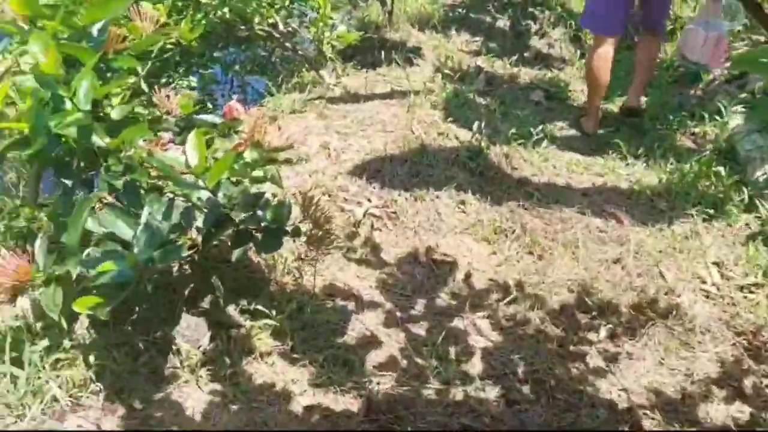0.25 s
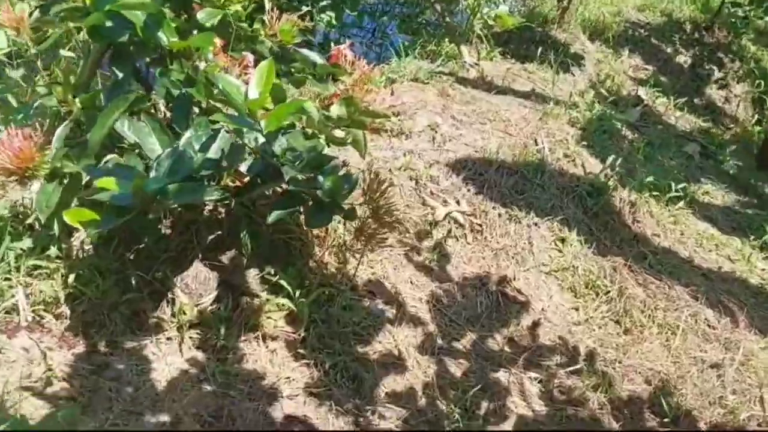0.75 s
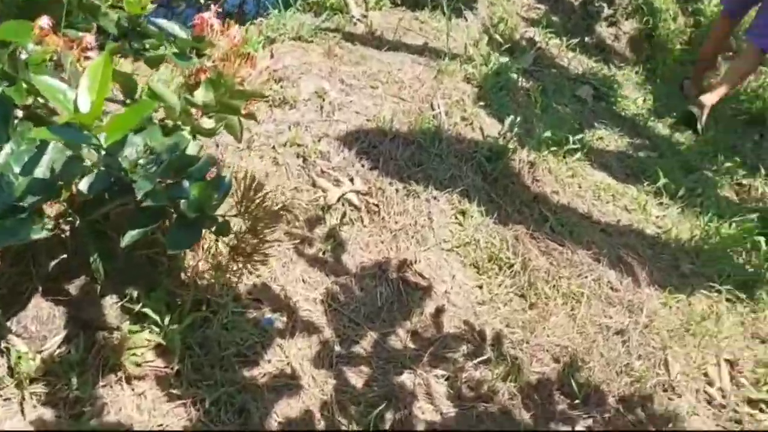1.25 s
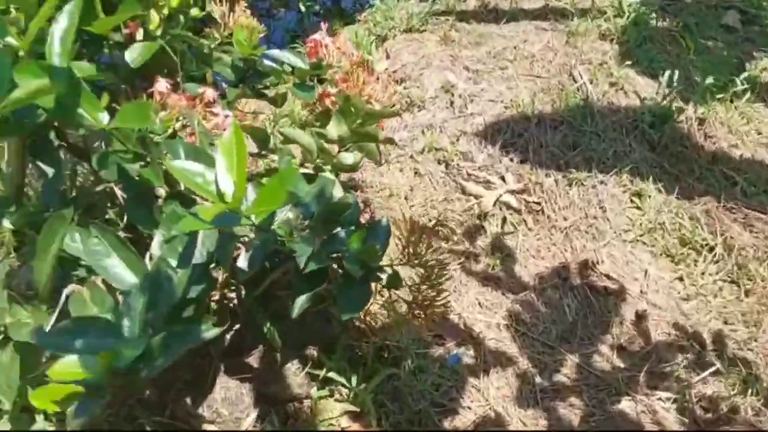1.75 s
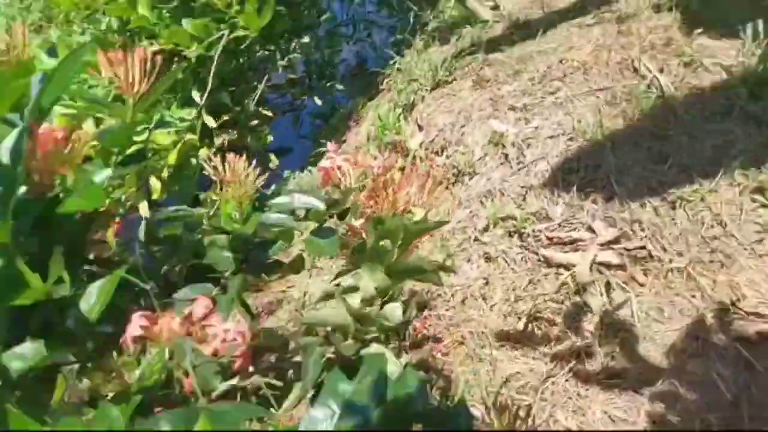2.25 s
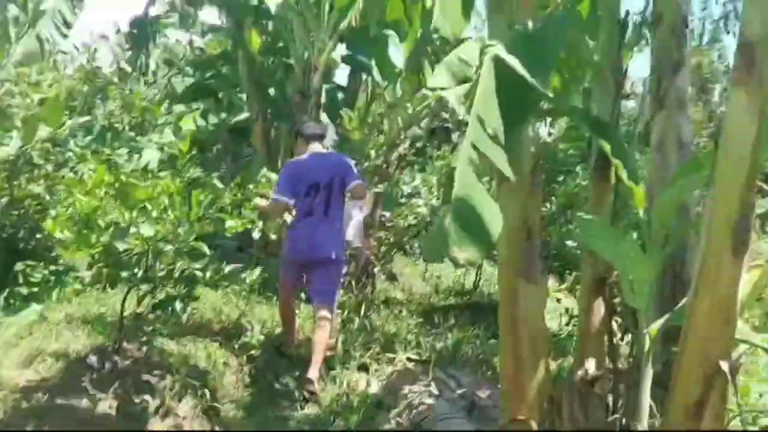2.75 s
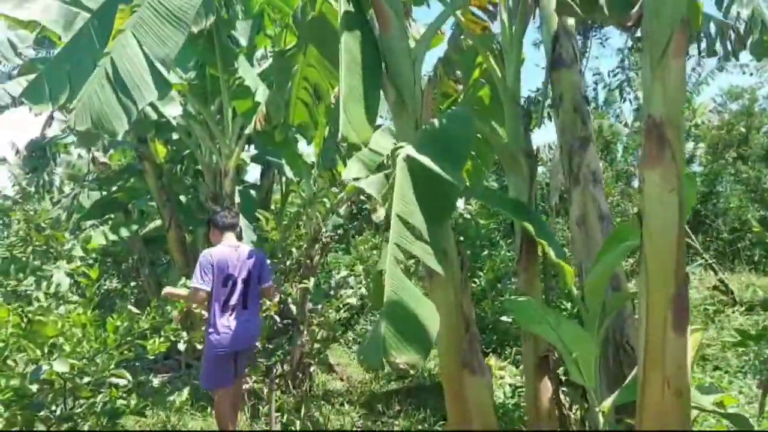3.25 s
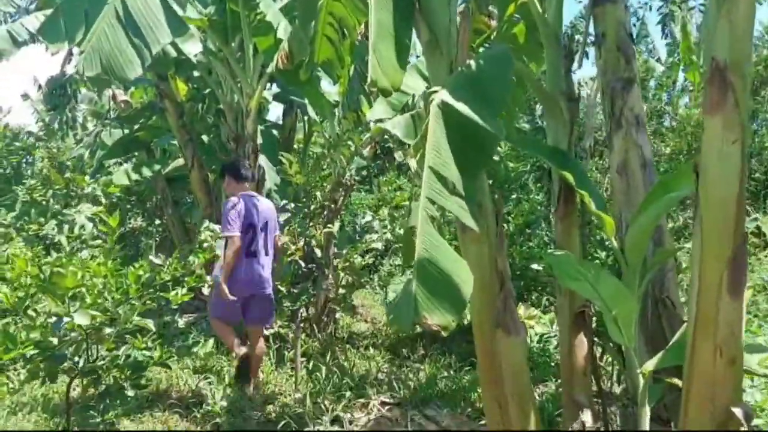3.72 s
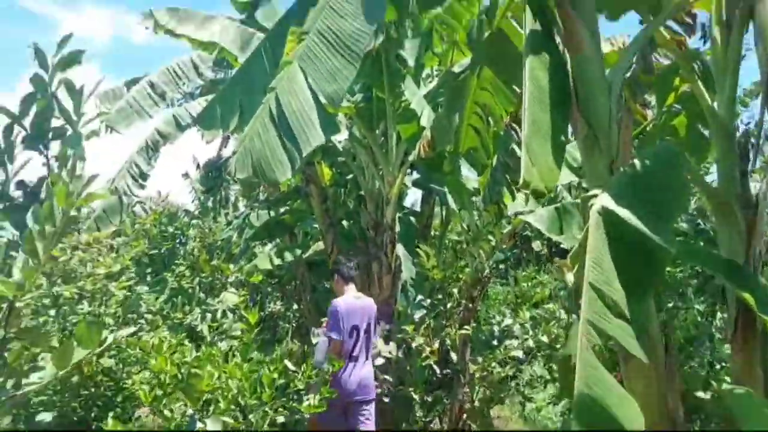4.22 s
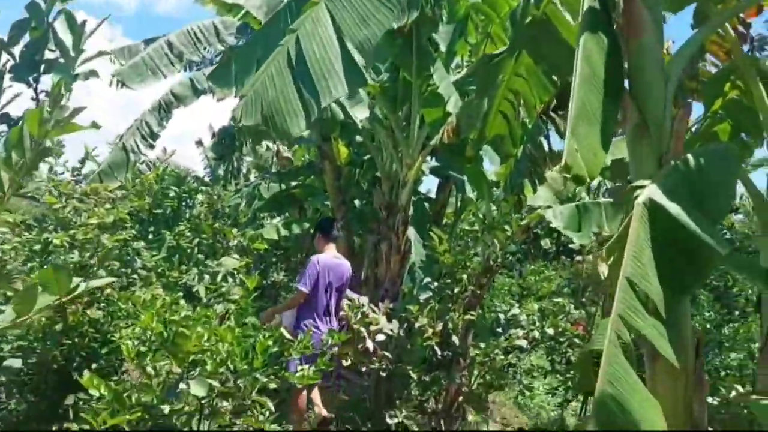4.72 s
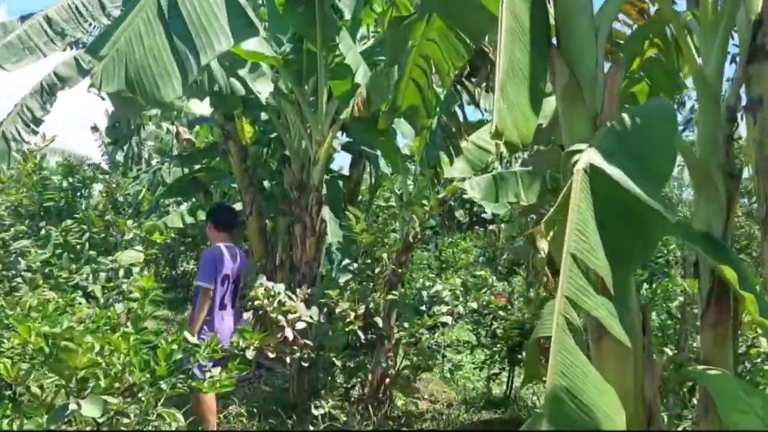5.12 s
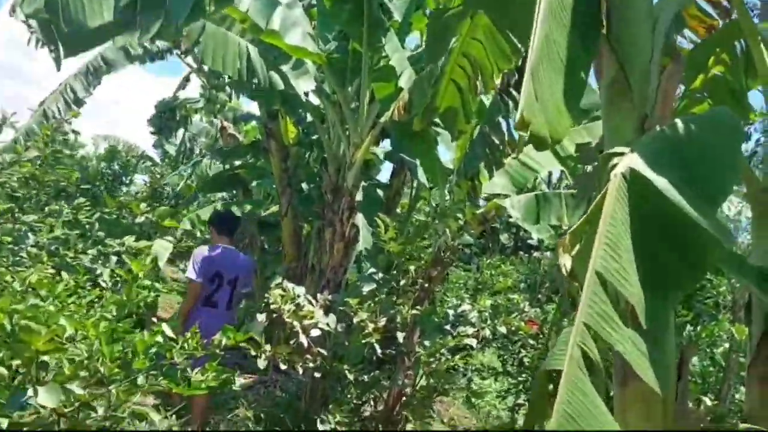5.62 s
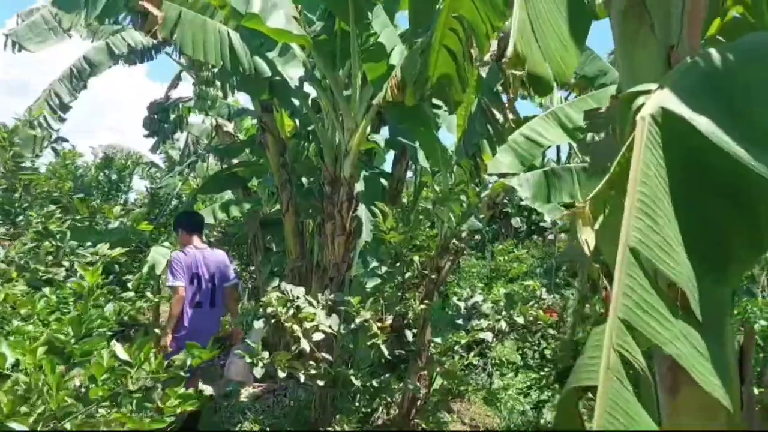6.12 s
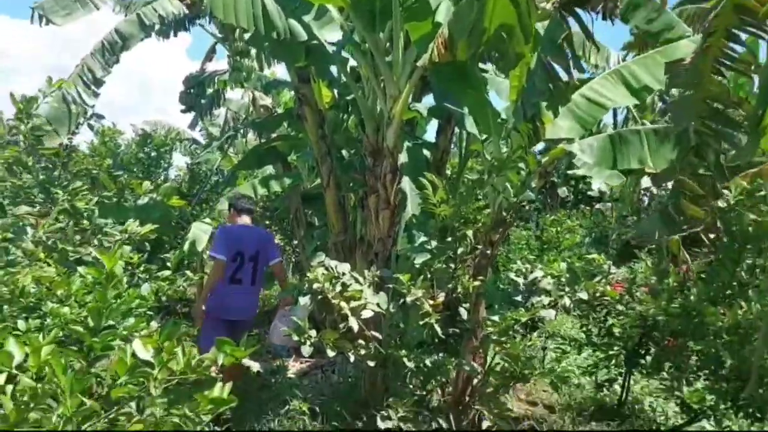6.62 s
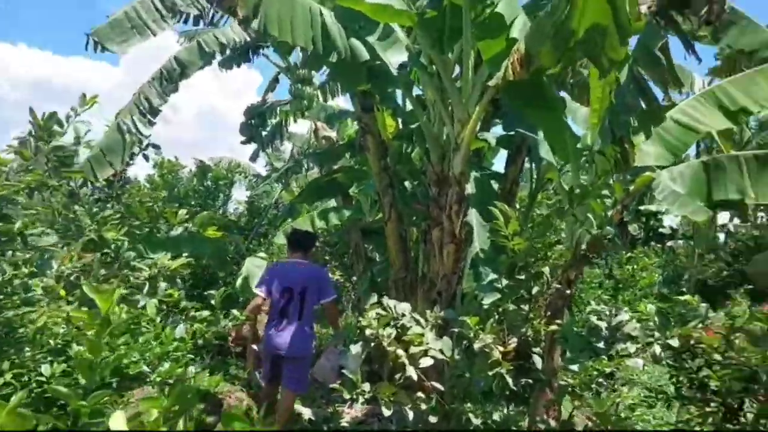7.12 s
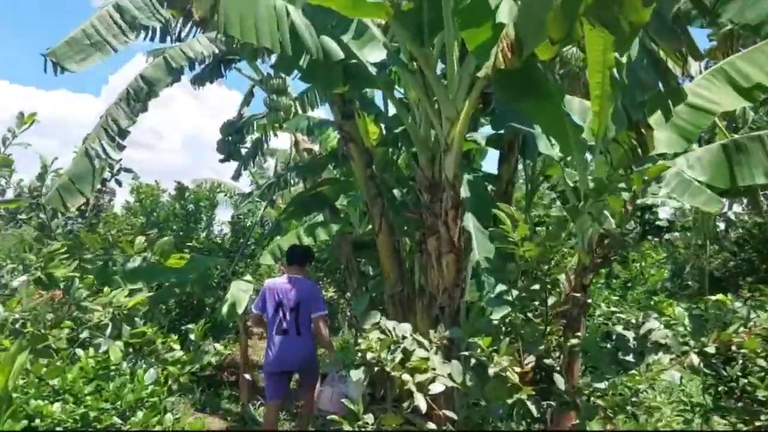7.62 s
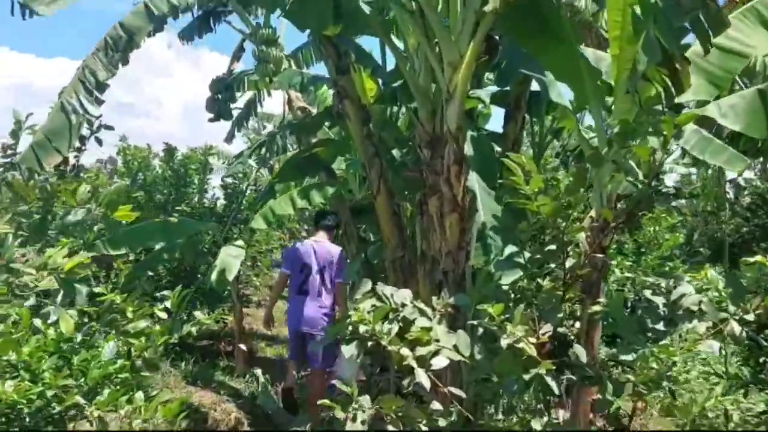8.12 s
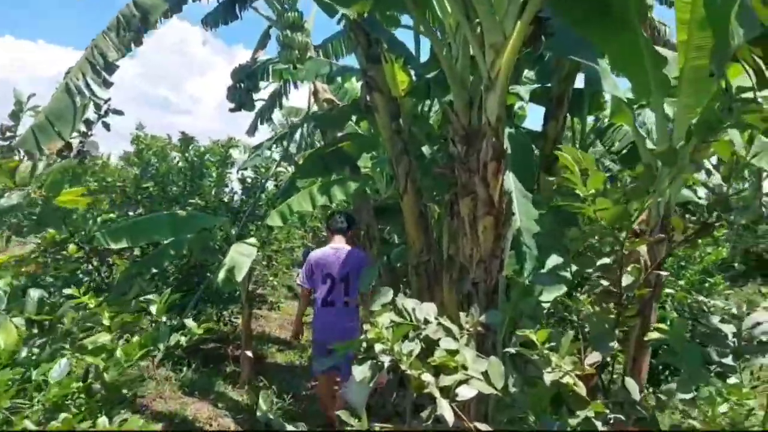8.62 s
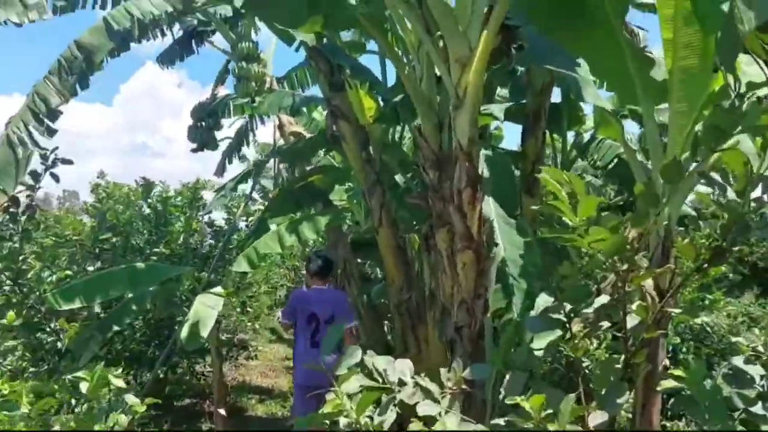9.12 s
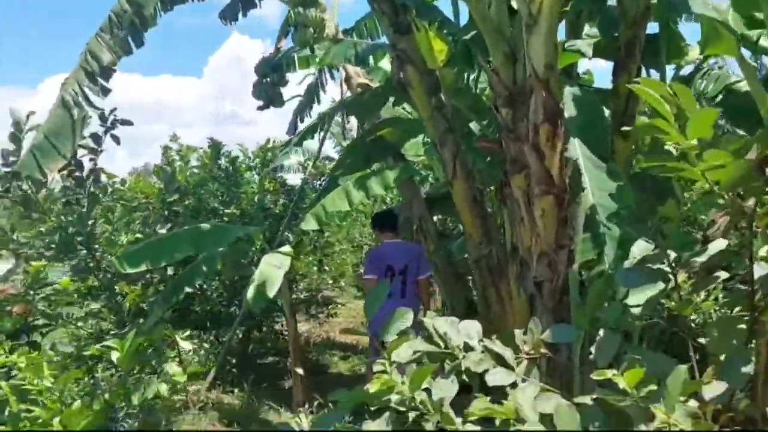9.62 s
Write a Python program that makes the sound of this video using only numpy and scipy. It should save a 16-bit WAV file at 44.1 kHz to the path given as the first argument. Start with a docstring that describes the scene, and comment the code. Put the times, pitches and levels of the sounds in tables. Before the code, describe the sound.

Outdoors among trees, someone walks unevenly over dry leaves and grass, crunching and breaking twigs near the microphone. Twice in the first half a bag crinkles with a hollow sound, the second time louder. The walking goes quiet for a moment, then resumes as a gust bumps the microphone. A very faint hoot passes far away, and soft wind rumble and distant rustling leaves lie underneath.

```python
"""Feet sweep through dry grass and leaf litter on an orchard path, over faint far foliage and low wind.
From the first steps stalks hiss, leaves crunch and twigs snap, loudest just before 1 s. Around 2 s and
again from 3.5 to 5 s a carried bag crumples, its creases ringing hollow air pockets; a flurry of snaps
tops the second bout. After a lull the steps pick up at 6 s and wind thumps the microphone ports.
A faint far hoot passes near 7.7 s, and the feet rustle on to the end."""
import sys
import numpy as np
from scipy import signal
from scipy.io import wavfile
from scipy.ndimage import uniform_filter1d

SR = 44100
rng = np.random.default_rng(int(sys.argv[2]) if len(sys.argv) > 2 else 0)


def int16_out(signal):
    """Quantize to a 16-bit WAV file."""
    q = np.round(np.clip(np.atleast_2d(signal).T, -1, 1) * 32767)
    wavfile.write(sys.argv[1], SR, q.astype(np.int16))


N = 434778


def gain_of(db):
    """Decibels to an amplitude factor."""
    return 10 ** (np.asarray(db) / 20)


def unit_rms(x):
    """Scales a signal to rms 1."""
    return x / np.sqrt(np.mean(x ** 2) + 1e-20)


def spectrum_at(points, hz):
    """Reads a spectrum table on a log frequency axis."""
    f, value = np.transpose(points)
    return np.interp(np.log(hz + 1), np.log(f + 1), value)


def automation(rows):
    """One curve per column after the time, one value a sample."""
    seconds, *columns = np.transpose(rows)
    return [np.interp(np.arange(N) / SR, seconds, column) for column in columns]


def wander(seconds):
    """Smooth random drift of rms 1 on the given time scale."""
    size = max(round(seconds * SR), 1)
    return unit_rms(uniform_filter1d(uniform_filter1d(rng.standard_normal(N), size), size))


def colour(x, points):
    """Minimum-phase EQ, so that clicks keep a sharp front."""
    db = np.maximum(spectrum_at(points, abs(np.fft.fftfreq(4096, 1 / SR))), -60)
    response = np.exp(np.conj(signal.hilbert(np.log(gain_of(db)))))
    taps = np.fft.ifft(response).real[:2048]
    return signal.oaconvolve(x, taps[None], axes=1)[:, :N]


def ring(x, hz, width_hz):
    """A two-pole resonance."""
    r = np.exp(-np.pi * width_hz / SR)
    return signal.lfilter([1 - r, 0, r - 1], [1, -2 * r * np.cos(2 * np.pi * hz / SR), r * r], x)


def drifting_ring(x, hz, width_hz):
    """A resonance whose pitch drifts by 3.5 %: shift down to zero, smooth twice, shift back."""
    pitch = hz * (1 + 0.035 * wander(0.06))
    carrier = np.exp(2j * np.pi * np.cumsum(pitch) / SR)
    x = x / carrier
    for width in (width_hz, 2 * width_hz):
        x = signal.lfilter([1], [1, -np.exp(-np.pi * width / SR)], x)
    return unit_rms((carrier * x).real)


def envelopes(rows):
    """Power of each event in 1 ms frames: ramps in dB around a hold, steeper past a knee."""
    ramp_db, knee, steepening = 20, 0.6, 0.72
    full_at, rise, hold, fall, db = np.abs(np.transpose(rows)[:5, :, None])
    t = np.arange(0, N / SR + 0.002, 0.001)
    away = np.maximum(full_at - t, 0) / (rise + 1e-4) + np.maximum(t - full_at - hold, 0) / (fall + 1e-4)
    return gain_of(-db - ramp_db * (away + steepening * np.maximum(away - knee, 0))) ** 2


def per_sample(frames):
    """Stretches 1 ms frames to one value a sample."""
    return np.interp(np.arange(N) / SR, np.arange(len(frames)) * 0.001, frames)


def total_gain(power):
    """Adds the powers of events into one gain curve."""
    return per_sample(np.sqrt(power.sum(0)))


def follow_loudest(power, values):
    """Power-weighted mean of one value per event."""
    return per_sample((power * values).sum(0) / (power.sum(0) + 1e-30))


def crackle(lag_ms, per_s, spread_db, clump_db, clump_s, scatter_ms, wet_db, t60, likeness,
            patches=3, pitched=False):
    """Clumped clicks; each reaches the ports with its own lag, then scatters off a patch of undergrowth."""
    chance, size = rng.random(N), np.minimum(rng.exponential(1, N), 5)
    side, sign = rng.standard_normal(N), rng.choice([-1, 1], N)
    clicks = sign * gain_of(spread_db * size + clump_db * wander(clump_s)) * (chance < per_s / SR)
    lag = (lag_ms + scatter_ms * side) * SR / 1000
    arrival = np.clip(np.arange(N) + 40 + lag, 0, N + 80)  # 40 samples of room for early clicks
    whole, part = arrival.astype(int), arrival % 1
    patch = rng.integers(0, patches, N)
    t, out = np.arange(3000) / SR, np.zeros((2, N))
    for k, hz in enumerate(np.geomspace(1800, 11900, patches)):
        right = clicks * (patch == k)
        if pitched:  # each tuft stirs on its own
            right = right * gain_of(2.5 * wander(0.013))
        left = np.bincount(whole, right * (1 - part), N + 90)
        left += np.bincount(whole + 1, right * part, N + 90)
        direct = np.array([left[40:N + 40], right])
        if pitched:  # and rings at its own pitch
            direct = direct + gain_of(9) * ring(direct, hz, 0.31 * hz)
        shared, apart = rng.standard_normal((2, len(t))) * gain_of(-60 * t / t60)
        tail = np.array([shared, likeness * shared + np.sqrt(1 - likeness ** 2) * apart])
        tail /= np.linalg.norm(shared)
        out += direct + gain_of(wet_db) * signal.oaconvolve(direct, tail, axes=1)[:, :N]
    return out


# Stereo image of the noise beds. Each row: frequency in Hz, left-right correlation.
BED_LIKENESS = [(60, 0.049), (300, 0.44), (800, 0.11), (2000, 0.17), (4000, 0.017)]


def noise_bed(points, patchy_db, swell_db):
    """Wide noise of a given spectrum, with drifting patches and slow swells."""
    frames, hz = N // 256 + 5, np.fft.rfftfreq(1024, 1 / SR)
    left_re, left_im, apart_re, apart_im, patches = rng.standard_normal((frames, 513, 5)).T
    patches = unit_rms(uniform_filter1d(uniform_filter1d(patches, 12, axis=0), 14, axis=1))
    likeness = spectrum_at(BED_LIKENESS, hz)[:, None]
    left = left_re + 1j * left_im
    right = likeness * left + np.sqrt(1 - likeness ** 2) * (apart_re + 1j * apart_im)
    spectra = np.array([left, right]) * gain_of(spectrum_at(points, hz)[:, None] + patchy_db * patches)
    bed = signal.istft(spectra, nperseg=1024, noverlap=768)[1][:, :N]
    return unit_rms(bed * gain_of(swell_db * wander(0.08)))


# Tone of the faint background rustle, with a microphone resonance near 1.9 kHz.
# Each row: frequency in Hz, relative level in dB.
RUSTLE_EQ = [(12, -29), (20, -32), (60, 14), (116, -8), (187, -0.5), (1030, -16), (1500, -21.5),
             (1900, -17), (2350, -25.5), (2750, -28.5), (6540, -29.5), (12100, -27.5), (14700, -30),
             (16000, -29.5)]


def far_foliage():
    """Distant trees rustle as a quiet, gently swelling bed."""
    return gain_of(-63) * noise_bed(RUSTLE_EQ, patchy_db=1.5, swell_db=2.0)


# Contour of the hoot. Each row: time in seconds, pitch in Hz, level in dB.
HOOT = [(7.55, 882, -72), (7.61, 844, -72), (7.666, 850, -75), (7.704, 887, -64), (7.83, 885, -71)]


def far_hoot():
    """A faint narrow tone, made breathy by fast jitter in pitch and level."""
    hz, db = automation(HOOT)
    t = np.arange(N) / SR
    gate = np.clip(np.minimum(t - HOOT[0][0], HOOT[-1][0] - t) / 0.021, 0, 1)
    level = gain_of(db + 3 * wander(0.0076))
    pitch = hz * (1 + 0.03 * wander(0.006))
    return level * gate * np.sin(2 * np.pi * np.cumsum(pitch) / SR)


# Fader ride of the wind. Each row: time in seconds, level in dB.
WIND_RIDE = [(0.0, -59.5), (0.41, -64.5), (1.64, -62), (2.03, -58.5), (2.36, -64.5), (2.74, -64.5),
             (3.07, -65.5), (4.01, -61.5), (4.61, -56.5), (4.83, -64), (5.82, -67), (7.14, -59.5),
             (7.63, -64.5), (7.93, -61), (8.87, -68.5), (9.4, -57.5), (9.86, -69)]
# Tone of the wind. Each row: frequency in Hz, relative level in dB.
WIND_EQ = [(12, -48), (20, -31), (75, -3.5), (108, -32.5), (144, 0), (182, -42.5), (260, -27.5), (340, -71),
           (570, -120)]


def wind_rumble():
    """Wind on the microphone ports makes an unbroken low rumble."""
    return gain_of(automation(WIND_RIDE)[0]) * noise_bed(WIND_EQ, patchy_db=2.5, swell_db=1.0)


# Wind hits. Each row: time of full level, rise, hold and fall in seconds, level in dB, pitch in Hz.
BUFFETS = [(0.580, .5, 0.0061, 0.23, -58, 110), (0.820, 0.079, .005, 0.47, -64, 110),
           (1.975, 0.11, .02, 0.075, -45.5, 75), (3.495, 0.089, .005, 0.14, -63.5, 100),
           (4.19, 0.28, 0.027, 0.25, -54.5, 65.3), (4.676, 0.08, 0.022, 0.09, -58, 100),
           (6.27, 0.07, 0.073, 0.066, -41, 67), (6.476, .05, 0.04, 0.06, -56, 47.7),
           (6.95, 0.13, .05, .1, -58, 55), (7.25, 0.23, .06, 0.075, -53, 62),
           (8.6, 0.11, 0.0042, 0.21, -53.5, 112), (9.237, 0.8, .005, 0.14, -62, 131),
           (9.476, 0.12, 0.037, 0.12, -54, 52), (9.637, .06, .03, .06, -53, 55),
           (9.693, 0.06, 0.07, 0.09, -55, 99)]
# Tone of the hits. Each row: frequency in Hz, relative level in dB.
BUFFET_EQ = [(12, -54), (25, -31), (50, 0), (90, -1), (140, -2), (220, -17.5), (340, -30), (570, -100)]


def wind_buffets():
    """Gusts hit the ports as lumps of low noise, each thumping at its own pitch."""
    power = envelopes(BUFFETS)
    hz = follow_loudest(power, np.transpose(BUFFETS)[5][:, None])
    lumps = noise_bed(BUFFET_EQ, patchy_db=4.0, swell_db=1.0)
    thump = gain_of(-2) * drifting_ring(lumps, hz, width_hz=50)
    return total_gain(power) * (0.33 * lumps + thump)


# Squeezes of the bag. Each row: time of full level, rise, hold and fall in seconds, level in dB,
# offset for the bag's low end in dB.
SQUEEZES = [(0.634, 0.12, .005, 0.03, -49, 7.5), (1.711, 0.02, 0.12, 0.1, -50, -4.5),
            (1.892, 0.079, 0.053, 0.28, -42, -2.5), (1.982, .05, 0.16, 0.029, -42, -12),
            (2.428, 0.017, 0.025, 0.071, -52.5, -17), (2.53, 0.057, 0.014, 0.11, -54.5, -2),
            (3.609, 0.31, 0.22, 0.078, -52.5, -5), (3.795, 0.076, 0.14, 0.093, -49, -10),
            (3.988, 0.037, 0.0022, 0.026, -40.5, -31), (4.02, 0.009, .003, .1, -40.5, -32),
            (4.094, .02, .005, .04, -54, -15), (4.158, 0.059, 0.082, 0.049, -39.5, -6),
            (4.36, 0.12, 0.24, 0.046, -51, -6), (4.553, .008, 0.026, 0.17, -38, -23),
            (4.606, 0.011, 0.051, 0.067, -38, 6), (4.655, .008, 0.015, .03, -44, -1),
            (4.692, 0.038, 0.011, 0.088, -30, 3.5), (4.747, 0.03, 0.0063, 0.007, -30, -22),
            (4.794, 0.02, 0.059, 0.085, -48, -7), (7.106, 0.002, 0.0016, 0.044, -58, 9),
            (7.889, 0.0058, 0.0018, 0.0076, -40, -5), (8.305, 0.003, 0.0023, 0.017, -55, -25),
            (9.203, 0.17, 0.026, 0.25, -62.5, 14.5)]
# The deep, low and broad top air pockets. Each row: pitch in Hz, width in Hz, relative level in dB.
POCKETS = [(324, 44, -11), (408, 81, -13), (750, 780, -9.5)]
# The main air pocket as the bag changes shape. Each row: time in seconds, pitch in Hz.
HOLLOW_PITCH = [(1.68, 600), (1.86, 590), (1.91, 670), (1.96, 664), (2.04, 557), (2.11, 600), (2.48, 610),
                (2.55, 553), (3.45, 555), (3.6, 620), (3.8, 650), (3.9, 577), (3.98, 720), (4.026, 540),
                (4.14, 600), (4.22, 524), (4.57, 584), (4.77, 617)]
# The top pocket as the grip tightens and loosens. Each row: time in seconds, gain in dB.
TOP_POCKET_RIDE = [(1.7, -42), (1.95, 3), (2.12, -11), (2.5, 4.5), (3.6, 2), (4.2, -0.5), (4.55, 1),
                   (4.75, 1.5), (7.0, 4.5)]


def bag_crumple(crunch_gain, lag_ms):
    """Sparse creases kick the bag's air pockets, on each squeeze and more softly with every step."""
    creases = crackle(lag_ms, per_s=550, spread_db=2.5, clump_db=0.5, clump_s=0.0092,
                      scatter_ms=0.058, wet_db=-2.5, t60=0.029, likeness=0.82)
    deep, low, top = [gain_of(db) * drifting_ring(creases, hz, width) for hz, width, db in POCKETS]
    thud = ring(ring(creases, hz=245, width_hz=495), hz=245, width_hz=1485)  # the whole bag
    low_end = deep + low + gain_of(-6.5) * unit_rms(thud)
    hollow = gain_of(-3.5) * drifting_ring(creases, automation(HOLLOW_PITCH)[0], width_hz=140)
    upper = hollow + gain_of(automation(TOP_POCKET_RIDE)[0]) * top
    power, low_db = envelopes(SQUEEZES), np.transpose(SQUEEZES)[5][:, None]
    upper_gain = np.hypot(total_gain(power), gain_of(-17.5) * crunch_gain)
    low_gain = np.hypot(total_gain(power * gain_of(low_db) ** 2), gain_of(-12) * crunch_gain)
    return (upper_gain * upper + low_gain * low_end) * gain_of([[0.8], [-0.8]])  # slightly left


# Twigs and stiff leaves breaking. Each row: start in seconds, peak of the ring in dB, pitch in Hz,
# tick over ring in dB, left over right in dB, delay at the left port in ms.
SNAPS = [(0.1568, -42.5, 4850, 5, -3, 0.036), (0.2463, -49, 1870, 22, -2.5, -0.54),
         (0.28, -26, 3900, -3, 0.0, 0.17), (0.5247, -47.5, 4200, 20, -1.5, 0.14),
         (0.576, -26.0, 4150.0, 9, 4, -0.15), (0.609, -36.0, 2070.0, -5.0, -2.0, -0.21),
         (0.6923, -40.5, 5800, 15.5, -7, -0.1), (0.72, -23, 9500, 7, 0, -0.13),
         (0.854, -25, 1880, -7.0, -2.0, -0.06), (0.8575, -21.0, 1800.0, -9.0, -2, -0.07),
         (0.8675, -15, 1790.0, 1, -3.5, -0.085), (0.8885, -21, 9800.0, 4.0, 3, -0.03),
         (0.8925, -22.5, 1810, 2.0, -4, -0.09), (0.9667, -38.0, 4630, -2.0, 0.5, -0.036),
         (1.0362, -41, 5050.0, 17, -5, -0.14), (1.0503, -43, 4460, 8.0, -2.0, -0.05),
         (1.0961, -32.5, 4150.0, 4.0, -2.5, 0.0), (1.166, -37, 3860.0, 1.0, -2.5, 0.0),
         (1.2055, -37, 2680.0, 10, 0, 0.094), (1.7512, -39.5, 1350, 14.5, 0, -0.0032),
         (1.7845, -35, 1800.0, -14.0, -2.0, 0.035), (1.825, -26, 1570.0, 5, -4, 0.06),
         (1.9034, -33, 685.0, -9.0, -7, -0.18), (1.9507, -28.5, 666, -6.0, -1, -0.11),
         (2.197, -45, 1910.0, 17, -1, 0.062), (2.374, -49, 1900.0, 13.0, -3.0, 0.087),
         (2.378, -29, 4530, -7.0, 0.0, 0.21), (2.514, -42, 1500.0, -7.0, 1.0, -0.21),
         (2.779, -46.5, 1960.0, 17, 2, -0.25), (3.121, -38.0, 1670, 8, 1, 0.11),
         (3.7523, -28.5, 2210.0, -2, -4, -0.13), (3.8309, -37, 700, 15.0, 3, -0.043),
         (4.101, -32, 1950, -2, -2.5, 0.072), (4.1427, -28, 2120, 2, -7, -0.11),
         (4.3705, -33.5, 694, -17, 3, -0.22), (4.4274, -32, 890, -14, 4, -0.0057),
         (4.4861, -25.5, 2030, 5, 0, -0.037), (4.525, -21.5, 566, 9, 5, -0.13),
         (4.5247, -24.0, 2000.0, -9.0, -5, -0.072), (4.5391, -25.0, 590, -6, -1.0, -0.019),
         (4.6074, -32, 660.0, 3.0, 0.5, 0.19), (4.6368, -23, 600, 7, 2.0, -0.3),
         (4.6547, -25, 510.0, 6, -2, 0.0059), (4.6604, -14.5, 1920, -5, -3, -0.16),
         (4.6728, -26.5, 1500, 22, 4, -0.11), (4.6794, -27, 1040, -12.0, 1.0, -0.3),
         (4.7471, -22.5, 990, -6, 2.5, -0.11), (4.7543, -26, 574, -13.0, 1.0, -0.013),
         (5.0897, -37.5, 1170, -18.0, 5, 0.17), (6.1362, -31.5, 4250, 10, -1.0, 0.11),
         (6.142, -30.5, 1800.0, -4, 0, 0.11), (6.1459, -41, 1720, 8.0, -4.0, 0.036),
         (6.1539, -34, 1610, -4.0, 2, 0.1), (6.1567, -28, 7460, 7, 1, 0.02),
         (6.1643, -40, 1500.0, -3, -3.0, -0.043), (6.192, -46, 5000.0, 8.0, 0.5, 0.05),
         (6.201, -42, 1500.0, 5, -2.5, -0.02), (6.8005, -39.5, 1160, 3, 2, 0.16),
         (7.1096, -31.5, 1540, -3, -1, -0.024), (7.1092, -31.5, 4250, 8, 6, -0.05),
         (7.2766, -45.5, 9300, 8, -2.5, 0.15), (7.436, -42, 1880.0, 12, 3, 0.044),
         (7.8878, -21.5, 1300.0, -26, -4.5, 0.061), (8.3071, -39.5, 1000.0, -19, -3, -0.04),
         (8.308, -26, 3550, 2, 8.5, -0.28), (9.0505, -67, 4000.0, 31, 0, 0.12),
         (9.1007, -42.0, 1880.0, 8.0, 0, 0.12), (9.1324, -34.5, 1470, 7, -2.0, 0.0),
         (9.2, -42, 1510.0, 1, -0.5, -0.01), (9.4033, -31, 3600, 7, 3.5, -0.065),
         (9.4275, -40.5, 1500, 24.5, -2.5, 0.098), (9.4795, -38, 11900, 5, 0, 0.12),
         (9.5549, -52.5, 1800.0, 18, -4, -0.0026)]
# Tone of dry stalks, for snap ticks and footstep hiss. Each row: frequency in Hz, relative level in dB.
STALK_EQ = [(1530, -14.5), (2600, -5), (3070, -4.5), (4100, -1.5), (6140, -4), (6670, -5), (12500, -1),
            (14900, -2), (16000, -10)]


def twig_snaps():
    """A break rings briefly at its own pitch with a bright tick; splinters trail after it."""
    out, t = np.zeros((2, N + 6000)), np.arange(5000) / SR
    grit_s, splinter_t60 = 0.0005, 0.086
    for start, db, hz, tick_db, pan_db, lag_ms in SNAPS:
        grit = rng.standard_normal((3, len(t)))
        crack = (t == 0) + 0.15 * np.exp(-t / grit_s) * grit[0]  # an impulse with a ragged edge
        splinters = gain_of(-60 * t / splinter_t60) * grit[1:]
        splinter_gain = gain_of(-25) * min(hz / 2000, 1)  # lower breaks splinter less
        tone = ring(ring(crack + splinter_gain * splinters, hz, 0.27 * hz), hz, 1.66 * hz)
        tick = colour(crack + gain_of(-27) * splinters, STALK_EQ)[:, :len(t)]
        snap = tone / abs(tone).max() + gain_of(tick_db) * tick / abs(tick).max()
        snap *= gain_of(db + np.array([[pan_db], [-pan_db]]) / 2)
        left_at, right_at = round((start + lag_ms / 1000) * SR), round(start * SR)
        out[0, left_at:left_at + len(t)] += snap[0]
        out[1, right_at:right_at + len(t)] += snap[1]
    return out[:, :N]


# EQ ride along the path. Each row: time in seconds, then airy treble, middle treble and low crunch in dB.
GROUND_RIDE = [(0.0, 9.5, -8.5, 7), (0.28, -4, -2, -4), (0.4, 0.5, -10, 0), (0.6, -2, 3.5, 6.5),
               (0.87, -1.5, 1.5, -1), (1.15, -1, 0.5, 0.5), (1.9, 1.5, 5, 2), (2.5, -0.5, 2, 1),
               (3.7, -1.5, -0.5, 1), (4.2, 3.5, 6, 4), (4.6, -1, 4.5, 1.5), (4.9, 0.5, 2.5, 0),
               (5.3, 7, 3, 3.5), (6.05, 3.5, -3, -6), (6.2, 2.5, -0.5, 4.5), (6.699, 4, -0.5, -2),
               (7.18, 1, -3, 5.5), (7.47, 0.5, 2, 1), (8.05, 4, -2, 2.5), (8.55, 0, -2, 1),
               (9.2, 3, 0, 6.5), (9.6, 1, -4.5, 0), (9.86, 8.5, 2.5, 2)]
# Those three bands. Each row: centre in Hz, width in Hz.
GROUND_BANDS = [(12300, 5000), (2700, 2200), (1050, 600)]


def ground_cover(x):
    """Lifts or lowers three broad bands along the path: the airy treble and the low crunch change with the
    litter underfoot, and the middle treble dips and swells."""
    for db, (hz, width) in zip(automation(GROUND_RIDE), GROUND_BANDS):
        x = x + (gain_of(db) - 1) * ring(x, hz, width)
    return x


# Sweeps of a foot. Each row: time of full level, rise, hold and fall in seconds, hiss level in dB,
# crunch over hiss in dB, delay at the left port in ms.
SWEEPS = [(0.104, 0.084, 0.007, 0.1, -55, -4, 0.0082), (0.278, .002, 0.012, .02, -44.5, -1, .13),
          (0.296, 0.011, 0.081, 0.069, -31, -14.5, 0.13), (0.528, 0.0036, .01, .03, -54.5, -16, -0.073),
          (0.553, 0.0304, 0.01, 0.043, -37, -9, -0.15), (0.577, 0.0035, 0.013, 0.051, -36, -3, -0.23),
          (0.613, 0.0094, 0.023, 0.012, -36, -7.5, -0.2), (0.731, 0.0056, 0.0018, 0.028, -59, -5, -0.23),
          (0.842, 0.09, 0.048, 0.068, -47.5, -3.5, -0.0034), (0.881, 0.052, .005, 0.062, -27.5, -15, -0.04),
          (1.113, 0.14, 0.059, 0.053, -40.5, -10.5, 0.029), (1.825, 0.08, 0.026, 0.23, -43, -2.5, -0.0046),
          (2.014, 0.31, 0.011, 0.26, -41.5, -8, -0.15), (2.19, .04, 0.0063, 0.02, -56.5, -16, -0.28),
          (2.389, 0.085, 0.1, 0.052, -50, -9.5, 0.21), (2.551, 0.15, .005, 0.076, -50, -9.5, 0.26),
          (2.776, 0.018, 0.009, 0.082, -60.5, 1, 0.079), (2.905, 0.15, 0.0055, 0.11, -49, -5.5, 0.07),
          (3.293, 0.099, .005, 0.35, -58.5, -3, 0.0015), (3.479, 0.05, 0.1, 0.32, -51.5, -5.5, -0.12),
          (3.84, 0.57, 0.0035, 0.039, -48.5, -2, -0.046), (4.096, 0.017, 0.0059, 0.063, -47, -1, -0.19),
          (4.151, 0.063, 0.1, 0.024, -43.5, -3.5, -0.11), (4.528, 0.0057, 0.0065, 0.011, -51.5, 10, 0.0081),
          (4.601, 0.14, 0.01, 0.17, -37.5, -5.5, -0.1), (4.694, 0.071, 0.045, 0.059, -43.5, -3, -0.19),
          (4.815, 0.22, 0.0061, 0.091, -48, -1.5, -0.16), (4.98, 0.096, 0.097, 0.089, -62, -6, 0.048),
          (5.082, 0.013, 0.0039, 0.17, -61, -1, -0.041), (5.336, 0.044, 0.004, 0.11, -58.5, -3, 0.12),
          (5.438, 0.11, 0.016, 0.086, -57.5, 1, 0.084), (5.506, .03, 0.14, 0.027, -67, -3, -0.011),
          (5.81, 0.054, 0.11, 0.12, -68.5, -3, 0.02), (6.049, 0.077, 0.15, .1, -51.5, -7.5, 0.059),
          (6.139, 0.003, 0.032, 0.16, -40.5, -7, -0.044), (6.288, 0.11, 0.066, 0.057, -57, -6.5, -0.31),
          (6.464, 0.1, 0.142, 0.092, -61.5, -9, -0.064), (6.612, 0.025, 0.0057, 0.074, -53, -14, -0.11),
          (6.801, 0.049, .005, 0.16, -58.5, 0, -0.074), (6.914, 0.076, 0.0066, 0.068, -55.5, -3, -0.062),
          (7.110, 0.0015, 0.032, 0.19, -53, -2, -0.05), (7.179, 0.1, .005, 0.079, -44, -13, -0.046),
          (7.444, 0.038, 0.023, 0.046, -46.5, -10, -0.015), (7.487, .02, 0.097, 0.34, -57, -9, 0.061),
          (7.897, 0.034, 0.011, 0.04, -52.5, 12.5, 0.061), (7.848, 0.088, 0.29, 0.16, -54.5, -3.5, -0.12),
          (8.307, 0.0015, 0.004, 0.08, -52, -6, -0.2), (8.477, .032, 0.03, 0.13, -46.5, -9, -0.094),
          (8.569, 0.056, 0.077, 0.11, -48, -4.5, 0.028), (8.883, 0.99, .005, 0.089, -61, -5, 0.074),
          (9.102, 0.0036, .01, 0.055, -50.5, -3, 0.24), (9.134, 0.05, 0.11, 0.28, -44.5, -7.5, 0.098),
          (9.426, 0.015, 0.0044, 0.12, -58.5, 4.5, -0.23), (9.812, 0.04, 0.027, 0.077, -57, -3.5, 0.046)]
# Litter that keeps stirring between sweeps. Each row: time in seconds, level in dB.
STIR_RIDE = [(0.0, -63.5), (0.26, -60.5), (0.45, -54.5), (0.75, -52.5), (1.38, -53.5), (1.5, -57.5),
             (2.3, -61.5), (2.68, -63.5), (3.06, -54), (3.4, -61), (3.95, -49), (4.3, -52), (4.45, -54.5),
             (4.9, -59.5), (5.15, -104), (6.4, -79), (6.7, -65), (7.35, -70), (7.8, -70), (9.3, -77),
             (9.6, -60.5), (9.86, -64)]


def foot_motion():
    """Sweeping feet and stirring litter set the hiss gain, the crunch gain and the left port's lag."""
    power = envelopes(SWEEPS)
    crunch_db, lag_ms = np.transpose(SWEEPS)[5:, :, None]
    stir = gain_of(automation(STIR_RIDE)[0])
    hiss_gain = np.hypot(total_gain(power), stir)
    crunch_gain = np.hypot(total_gain(power * gain_of(crunch_db) ** 2), stir * gain_of(-6.5))
    return hiss_gain, crunch_gain, follow_loudest(power, lag_ms)


# Tone of the leaf crunch through the microphone's 2 kHz resonance.
# Each row: frequency in Hz, relative level in dB.
CRUNCH_EQ = [(530, -20.5), (900, -9.5), (1450, -4), (1750, -0.5), (2010, 2), (2410, -3), (2800, -10),
             (3640, -19), (6160, -120)]


def footsteps(hiss_gain, crunch_gain, lag_ms):
    """Fine clicks of stalks make the hiss; fewer, larger breaks add leaf crunch and some treble."""
    fine = unit_rms(crackle(lag_ms, per_s=5000, spread_db=3.5, clump_db=1.5, clump_s=0.0029,
                            scatter_ms=0.035, wet_db=3.5, t60=0.054, likeness=0.19,
                            patches=8, pitched=True))
    coarse = unit_rms(crackle(lag_ms, per_s=1200, spread_db=3.0, clump_db=2.5, clump_s=0.012,
                              scatter_ms=0.11, wet_db=1.0, t60=0.066, likeness=0.66))
    hiss = unit_rms(colour(fine + 0.52 * coarse, STALK_EQ))
    crunch = unit_rms(colour(coarse, CRUNCH_EQ)) * gain_of([[-0.8], [0.8]])  # slightly right
    pan = gain_of(-4.5 * np.array([lag_ms, -lag_ms]) / 2)  # louder at the port it reaches first
    return pan * ground_cover(hiss_gain * hiss + crunch_gain * crunch)


def scene():
    """Feet, bag and snaps over wind, a hoot and the far rustle of the trees."""
    hiss_gain, crunch_gain, lag_ms = foot_motion()
    background = wind_rumble() + wind_buffets() + far_foliage()
    walker = footsteps(hiss_gain, crunch_gain, lag_ms) + bag_crumple(crunch_gain, lag_ms) + twig_snaps()
    return background + far_hoot() + walker


def record(dry):
    """A 40 Hz low cut and a steep band limit at 15.9 kHz."""
    low_cut = signal.butter(4, 40, "high", fs=SR, output="sos")
    band_limit = signal.firwin(511, 15900, window=("kaiser", 9), fs=SR)
    return signal.oaconvolve(signal.sosfilt(low_cut, dry), band_limit[None], "same")


dry = scene()
out = record(dry)
int16_out(out)
```